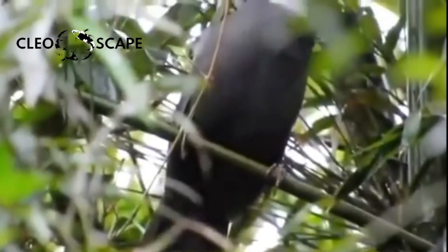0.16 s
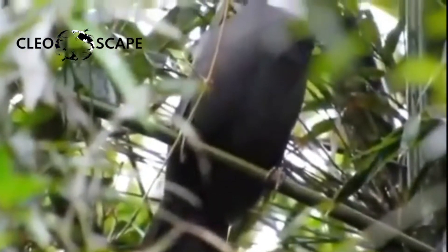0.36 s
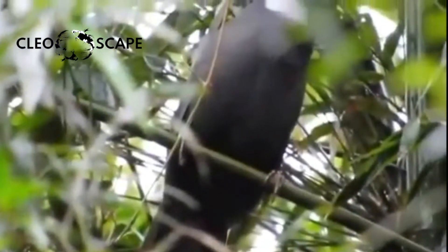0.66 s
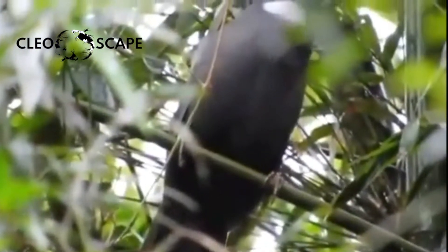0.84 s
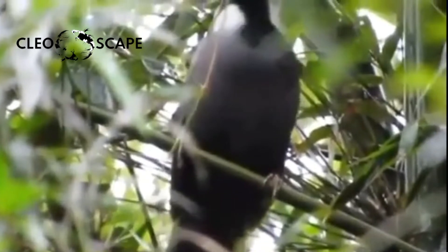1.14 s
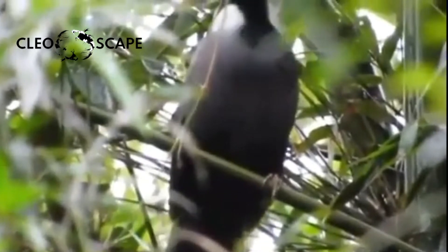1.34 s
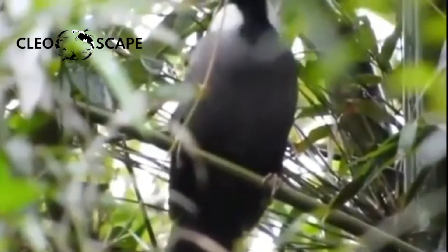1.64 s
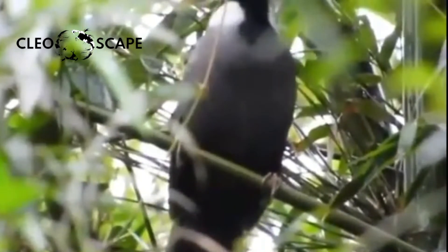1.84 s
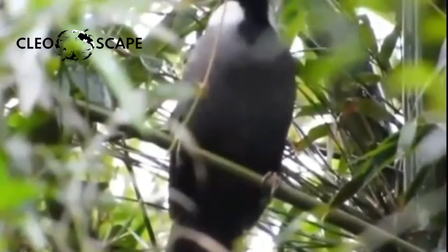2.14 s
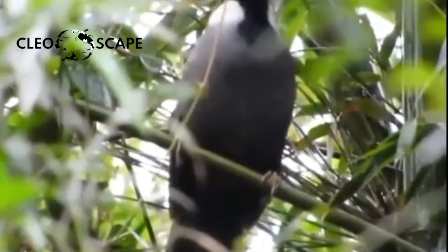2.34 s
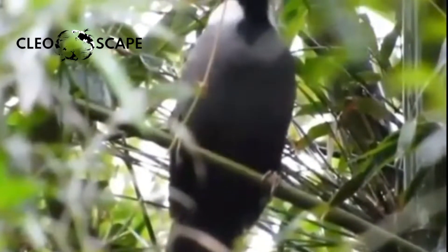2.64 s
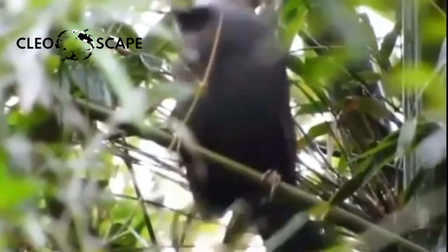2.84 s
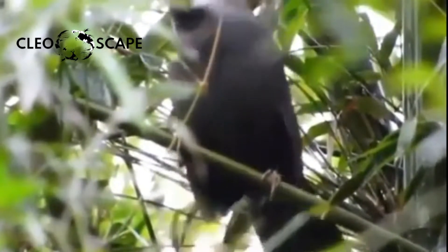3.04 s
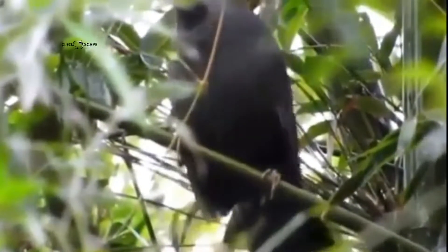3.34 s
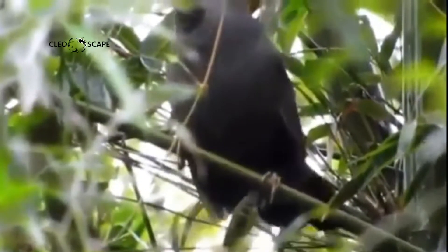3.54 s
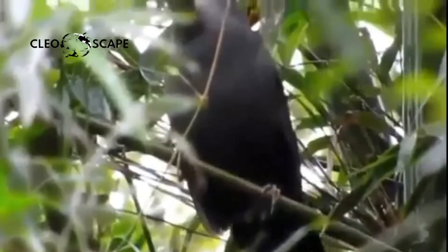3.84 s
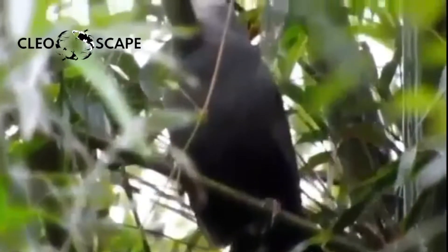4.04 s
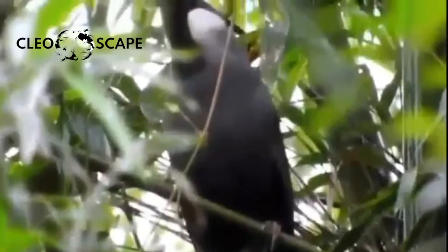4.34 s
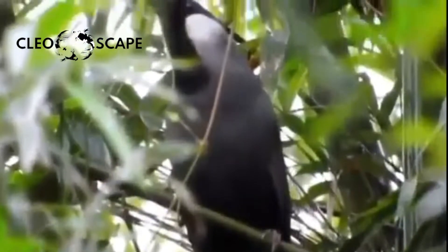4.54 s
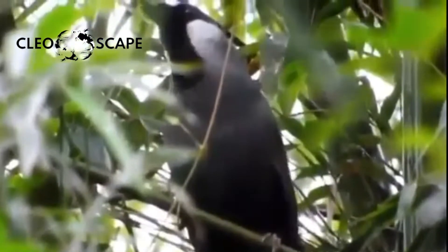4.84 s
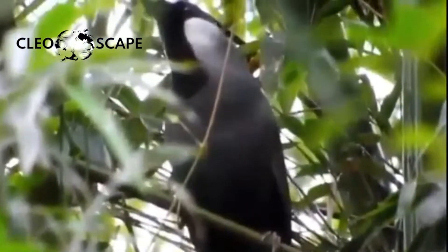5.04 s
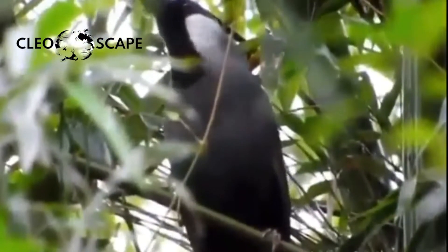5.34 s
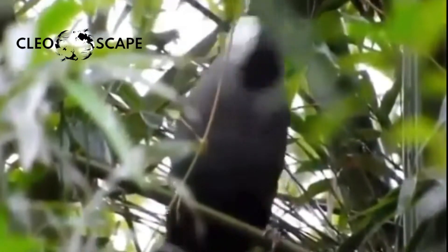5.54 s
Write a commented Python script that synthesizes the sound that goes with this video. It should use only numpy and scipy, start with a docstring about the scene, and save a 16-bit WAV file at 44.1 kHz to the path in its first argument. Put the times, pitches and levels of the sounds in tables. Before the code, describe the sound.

A songbird close by whistles, yelps, hoots softly, rasps upward and breaks into quick warbles while a second bird answers in leafy woodland.

```python
"""A laughingthrush sings close by in dense foliage: an arched whistle, six yelps, a run of hoots, three rising
rasps, then down-slurs that break into warbles. Each voice sums harmonics of an unsteady pitch; throat filters and
noise roughen the harsh ones. A second bird answers with thin and flute-like notes, bent along arched pitch curves.
Echoes and decaying scatter spread the song among leaves and stems, with faint far calls and shaped noise for the
low outdoor rumble; the loudest peaks overload the recorder and flatten."""
import sys
import numpy as np
from scipy import signal
from scipy.fft import rfft, irfft
from scipy.io import wavfile
from scipy.ndimage import uniform_filter1d

SR = 44100
rng = np.random.default_rng(int(sys.argv[2]) if len(sys.argv) > 2 else 0)


def digitize_waveform(pressure):
    """Quantize a signal to 16-bit integers and store it at the path in sys.argv[1].

    Rows of a 2-D input are taken as channels; values are limited to [-1, 1].
    """
    field = np.atleast_2d(pressure).T
    bounded = np.clip(field, -1, 1)
    quanta = np.round(bounded * 32767).astype(np.int16)
    wavfile.write(sys.argv[1], SR, quanta)


N = 250929  # length in samples

# Note levels are set ahead of the throat filters and the foliage.
# the arched whistle's curve: time_s, pitch_hz, level_db
WHISTLE_CURVE = [(0, 972, -5), (.036, 1002, -11.5), (.075, 1260, -11), (.122, 1594, -2.5), (.185, 1867, 0),
                 (.232, 2004, -4.5), (.295, 2009, -4), (.328, 1833, -3), (.39, 1200, -11), (.463, 926, -9)]
# yelps: start_s, length_s, top_hz, level_db, top_at (share of length), ease_db (cut at the top, negative swells),
# fall (roundness, power), rise_db (extra level up to the top)
YELP_NOTES = [(0.692, 0.12, 1702, -6, 0.38, -8, 1.24, -8), (0.911, 0.12, 1651, -7, 0.45, 0, 1.3, -3.5),
              (1.128, 0.12, 1658, -7, 0.39, -0.5, 1.32, -3), (1.36, 0.12, 1708, -7, 0.38, -1.5, 1.32, -5),
              (1.594, .111, 1756, -6.5, 0.39, 8, 1.02, -3), (1.81, 0.1, 1730, -6.5, 0.41, 6.5, 0.99, -3)]
# soft hoots: start_s, length_s, pitch_hz, level_db, sag (share of pitch lost at the end)
HOOT_NOTES = [(2.265, 0.033, 1020, -24, 0.019), (2.331, 0.04, 1011, -13, 0.0065),
              (2.405, 0.044, 1016, -13, 0.012), (2.483, 0.044, 1016, -13.5, 0.027),
              (2.563, 0.042, 1018, -13.5, 0.029), (2.639, 0.045, 1009, -13, 0.05),
              (2.724, 0.043, 1024, -13.5, 0.034), (2.81, 0.039, 1005, -11.5, 0.036),
              (2.904, 0.039, 996, -14, 0.024), (2.996, 0.042, 898, -20, 0.16)]
# rising rasps: start_s, length_s, base_hz, climb_hz_per_s, flick_s, crest_hz, level_db, attack_s,
# roughness (0-1, at the start)
RASP_NOTES = [(3.226, 0.3, 885, 1610, .016, 1880, -14.5, 0.039, 0.93),
              (3.712, 0.29, 943.3, 1651, .021, 1947, -13.5, 0.029, 0.57),
              (4.171, 0.33, 1017, 1375, .015, 1888, -16.5, 0.022, 0.9)]
# the short, harsh chuck before the first warble: time_s, pitch_hz, level_db, roughness (0-1)
CHUCK_CURVE = [(4.775, 998, -29.5, 0.2), (4.803, 963, -13, 0.19), (4.825, 774, -28, 0)]
# quick down-slurs, one of them upward: start_s, length_s, first_hz, last_hz, level_db
SLUR_NOTES = [(4.755, 0.03, 1230, 1164, -20), (4.799, 0.042, 1145, 960, -19),
              (4.784, 0.11, 877, 631, -30.5), (5.143, .053, 1577, 1068, -8.5),
              (5.54, .017, 1450, 1540, -15), (5.548, 0.049, 1526, 1077, -6)]
# warbles: start_s, length_s, climb_start_s, climb_length_s, low_hz, level_db, crest_s (sets where the ripples fall)
WARBLE_NOTES = [(4.824, 0.22, 4.86, 0.18, 993, -19.5, 4.993), (5.263, .17, 5.294, 0.15, 1086, -18.5, 5.84),
                (5.62, 0.076, 5.665, 0.075, 1092, -22.5, 6.1)]
# the second bird's flute notes: start_s, length_s, first_hz, top_hz, last_hz, level_db, top_at (share of length),
# fall (roundness, power), high_db (added to the fifth harmonic and up)
FLUTE_NOTES = [(0.151, .11, 1240, 1333, 1363, -21, 0.55, 2, -18),
               (4.711, 0.095, 888, 1038, 950, -23.5, 0.45, 2.1, -7),
               (5.112, 0.072, 1744, 1867, 1600, -15, 0.22, 0.58, -14.5),
               (5.179, .102, 1635, 1794, 1080, -16.5, 0.44, 3.1, -0.5),
               (5.328, .11, 997, 1304, 1297, -20, .75, 2.8, 1),
               (5.597, 0.095, 1846, 1830, 1220, -16.5, 0.11, .75, -11.5)]
# the second bird's thin, high notes: start_s, length_s, first_hz, top_hz, last_hz, level_db
THIN_NOTES = [(3.42, .41, 1473, 1864, 1693, -24.5), (4.035, .39, 1352, 1811, 1616, -21)]
# faint calls of birds farther off, ahead of a final trim:
# start_s, length_s, first_hz, top_hz, last_hz, level_db
DISTANT_NOTES = [(2.14, 0.16, 3360, 3000, 2840, -52), (2.28, 0.059, 2066, 2286, 2200, -46),
                 (2.98, 0.087, 4200, 4140, 4100, -49), (3.04, 0.075, 2150, 2350, 2330, -50)]

# overtone balance of each voice, following the pitch: harmonic (multiple of pitch), level_db
WHISTLE_HARMONICS = [(1, -3), (2, -31), (3, -39), (4, -47.5), (6, -41.5), (9, -57), (12, -47)]
# yelp overtones: harmonic (multiple of pitch), level_db
YELP_HARMONICS = [(1, -1.5), (3, 0), (4, -8), (6, -15.5), (12, -19.5)]
# hoot and far-call overtones: harmonic (multiple of pitch), level_db
HOOT_HARMONICS = [(1, 1.5), (2, -31.5), (3, -32), (4, -48), (12, -93)]
# rasp overtones: harmonic (multiple of pitch), level_db
RASP_HARMONICS = [(1, -1), (2, 0), (3, -4.5), (4, -2), (5, -10), (12, -15)]
# overtones of the rasp once it clears: harmonic (multiple of pitch), level_db
RASP_CLEAR_HARMONICS = [(1, 1), (2, -4), (3, 3), (4, -5.5), (12, -17)]
# slur overtones: harmonic (multiple of pitch), level_db
SLUR_HARMONICS = [(1, -14), (2, -3), (3, -24.5), (4, -29), (5, -30), (7, -46), (12, -47)]
# warble overtones: harmonic (multiple of pitch), level_db
WARBLE_HARMONICS = [(1, -6.5), (2, -1.5), (3, -21.5), (4, -28), (6, -36), (12, -48)]
# flute overtones, before high_db: harmonic (multiple of pitch), level_db
FLUTE_HARMONICS = [(1, -0.5), (2, -36), (3, -38), (4, -24), (5, -17.5), (6, -26), (12, -76)]
# thin-note overtones: harmonic (multiple of pitch), level_db
THIN_HARMONICS = [(1, -7), (2, -7.5), (3, -2.5), (4, -13), (5, -12.5), (6, -14), (7, -44), (8, -45),
                  (12, -65)]

# throat of the yelps, held still while harmonics sweep through: frequency_hz, gain_db
YELP_RESONANCE = [(600, -21.5), (1100, -18), (1700, -13.5), (2200, -12.5), (2700, -14), (3400, -17),
                  (3700, -7.5), (3980, 0), (4300, -16), (5100, -14), (6500, -19.5), (8200, -18.5),
                  (10000, -26.5), (16000, -27)]
# throat of the rasps, held still too: frequency_hz, gain_db
RASP_RESONANCE = [(500, -39), (900, -9), (1300, -10.5), (1750, -5.5), (2200, -1), (2600, -5), (3000, -5.5),
                  (3500, -4), (4000, 0), (4450, 0), (5000, -18), (5750, -4), (6600, -15.5), (15500, -23.5)]
# fixed windpipe resonance that lights up high overtones of clear notes: frequency_hz, gain_db
WINDPIPE_RESONANCE = [(2000, 0), (4200, 0), (5600, -2), (6500, 2), (7250, 15), (7900, 3), (9300, 10),
                      (10000, -8), (11000, -3), (15000, -6)]
# single reflections off stems: delay_s, level_db
STEM_ECHOES = [(.0065, -12.5), (0.0107, -12.5), (0.022, -22), (0.037, -17.5)]
# decay of the far scatter: frequency_hz, t60_s
LEAF_DECAY = [(500, 0.24), (1000, 0.5), (2000, 0.58), (3000, 0.4), (4000, 0.35), (5500, 0.58), (8000, 0.54),
              (15000, 0.34)]
# tonal shape of the outdoor background: frequency_hz, relative_level_db (per Hz)
AIR_SPECTRUM = [(20, -25), (40, -13), (65, -2.5), (100, 0), (135, -2), (190, -8), (260, -17), (450, -20.5),
                (1300, -19.5), (2500, -23.5), (4500, -25.5), (7700, -31.5), (11000, -38), (15000, -45)]
# left-right likeness of the background: frequency_hz, likeness (-1 to 1)
AIR_LIKENESS = [(60, 1), (240, 0.83), (950, 0.77), (3770, 0.76), (15000, -0.63)]

YELP_FIRST, YELP_LAST = .6, .49  # first and last pitch as shares of the top
YELP_LOCK_HZ, YELP_LOCK_WIDTH_HZ, YELP_LOCK = 1316, 170, 0.434  # falling pitch lingers where the throat rings
BILL_OPEN_S, BILL_SHUT_HZ = 0.024, 4240  # the bill opens: the treble joins a moment after the start
RASP_SCOOP_HZ, RASP_SCOOP_S = 171, .02  # each rasp scoops up from below
RASP_DROP_S, RASP_DROP_HZ_PER_S = 0.013, 8700  # and drops off after its crest
RASP_SAG_DB, RASP_CREST_DB = -4, -1  # level sags along the rasp; the voice thins as it flicks to the crest
RASP_PUSH_DB, RASP_PUSH_HZ, RASP_PUSH_WIDTH_HZ = 4.5, 1480, 140  # one last push on the way up
WARBLE_RATE_HZ = 47.5  # ripples per second
WARBLE_TOP_HZ, WARBLE_TOP_DB, WARBLE_MID_DB = 1905, 5.5, -7.5  # end of the climb; level change there and midway
WARBLE_DEPTH, WARBLE_MID_DEPTH = 0.06, .22  # dips as a share of pitch: always, and added midway up the climb
# unsteadiness as a share of pitch; the fray scales with the warble's dip depth
WHISTLE_JITTER, THIN_JITTER, WARBLE_JITTER, WARBLE_FRAY = .0035, .0035, .003, .02
AIR_DB = -33.5  # rms of the background before it leans to one side
EDGE_HZ = 15850  # upper band limit


def syrinx(t, hz, db, tone, jitter, order=14):
    """A vibrating membrane: harmonics of one slightly unsteady pitch."""
    phase = 2 * np.pi * np.cumsum(hz * (1 + jitter * wander(t, 730))) / SR
    wave = 0
    for k in range(1, order):
        audible = k * hz < SR / 2
        wave = wave + amp(read(tone, k)) * np.cos(k * phase) * audible
    fade = np.clip(np.minimum(t - t[0], t[-1] - t) / 0.00053, 0, 1)  # keeps the ends free of clicks
    return np.sqrt(2) * amp(db) * fade * wave


def notes(courses, tone, jitter):
    """Clear notes: the membrane glides along each curve of time, pitch and level."""
    out = np.zeros(N)
    for t, hz, db in courses:
        add(out, t[0], syrinx(t, hz, db, tone, jitter))
    return out


def whistle(attack_s=0.02, release_s=0.019):
    """A clear note winds along one arch; the windpipe lights up its high overtones."""
    t, hz, db = curves(WHISTLE_CURVE, size=600)
    course = t, hz, db + gate(t, attack_s, release_s)
    return coloured(notes([course], WHISTLE_HARMONICS, WHISTLE_JITTER), WINDPIPE_RESONANCE)


def yelps(hiss_db=-6, jitter=0.014, flutter=0.49, uneven_db=1.0, attack_s=0.011, release_s=.009):
    """Each yelp arches up and down; it flares where the third harmonic crosses the throat resonance."""
    out = np.zeros(N)
    for start, length, top_hz, loud_db, top_at, ease_db, fall, rise_db in YELP_NOTES:
        t, u = span(start, length)
        hz = arch(u, YELP_FIRST * top_hz, top_hz, YELP_LAST * top_hz, top_at, rise=1.85, fall=fall)
        falling = np.clip((u - top_at) / 0.19, 0, 1)
        nearness = np.exp(-((hz - YELP_LOCK_HZ) / YELP_LOCK_WIDTH_HZ) ** 2)
        hz = hz - falling * YELP_LOCK * (hz - YELP_LOCK_HZ) * nearness
        db = loud_db + rise_db * (1 - falling) - ease_db * (hz / hz.max()) ** 10
        db = db + gate(t, attack_s, release_s)
        strain = np.linspace(.4, 1.3, len(t))  # the voice frays toward the end of the yelp
        tone = syrinx(t, hz, db + uneven_db * wander(t, 80), YELP_HARMONICS, jitter * strain)
        hiss = strain * amp(db + hiss_db) * wander(t, 21000)
        fluttered = tone * (1 + flutter * strain * wander(t, 370))
        add(out, t[0], fluttered + opening(hiss))
    return coloured(out, YELP_RESONANCE)


def hoots(scoop=0.118):
    """Soft, nearly pure notes that scoop up to pitch and sag as they close."""
    out = np.zeros(N)
    for start, length, hz, db, sag in HOOT_NOTES:
        t = np.arange(0, length, 1 / SR)
        u = t / length
        bend = 1.015 - scoop * np.exp(-u / 0.22) - sag * u ** 4
        swell = np.sin(np.pi * u) ** 1.05
        add(out, start, swell * syrinx(t, hz * bend, db, HOOT_HARMONICS, jitter=0.0081))
    return out


def climbs(release_s=0.0052, clearing=1.04):
    """Time, pitch, level and roughness of each rasp: a scoop, a climb that clears, a flick to the crest."""
    for start, length, base_hz, climb, flick_s, crest_hz, loud_db, attack_s, rough in RASP_NOTES:
        t, u = span(start, length)
        crest_s = length - RASP_DROP_S
        age = np.minimum(t - start, crest_s)
        past = np.maximum(t - start - crest_s, 0)
        hz = base_hz + climb * age - RASP_SCOOP_HZ * np.exp(-age / RASP_SCOOP_S)
        flick = np.exp((age - crest_s) / flick_s)
        hz = hz + (crest_hz - hz[-1]) * flick - RASP_DROP_HZ_PER_S * past
        push = RASP_PUSH_DB * np.exp(-((hz - RASP_PUSH_HZ) / RASP_PUSH_WIDTH_HZ) ** 2)
        db = loud_db + RASP_SAG_DB * np.sin(np.pi * u / 2) + push + RASP_CREST_DB * flick
        yield t, hz, db + gate(t, attack_s, release_s), rough * np.cos(np.pi * u / 2) ** (2 * clearing)


def rasps(jitter=0.069, flutter=0.51, hiss_db=0, split=1.53, rattle_db=2, clear_hz=1370, blend_hz=100):
    """The membranes rattle irregularly at first and lock into a clear tone as pitch climbs; also the chuck."""
    out = np.zeros(N)
    for t, hz, db, rough in [*climbs(), curves(CHUCK_CURVE)]:
        rough = np.clip(rough, 0, 1)
        # strong and weak cycles alternate in fits, which puts partials between the harmonics
        halves = split * wander(t, 82) * np.cos(np.pi * np.cumsum(hz) / SR)
        tone = syrinx(t, hz, db, RASP_HARMONICS, jitter * np.sqrt(rough))
        tone = tone * (1 + rough * (flutter * wander(t, 760) + halves))
        # near the top of the climb the rattling voice gives way to a steadier one
        clear = np.clip((hz - clear_hz) / blend_hz, 0, 1)
        clear_tone = syrinx(t, hz, db, RASP_CLEAR_HARMONICS, jitter * rough)
        tone = (1 - clear) * tone + clear * clear_tone
        hiss = rough * amp(db + hiss_db) * wander(t, 22500)
        rattle = amp(rattle_db * np.sqrt(rough) * wander(t, 140))
        add(out, t[0], opening(rattle * ((1 - rough / 2) * tone + hiss)))
    return coloured(out, RASP_RESONANCE)


def opening(sound):
    """Muffles the start of a call while the bill is still opening."""
    muffled = signal.sosfiltfilt(signal.butter(2, BILL_SHUT_HZ, fs=SR, output="sos"), sound)
    shut = np.exp(-(np.arange(len(sound)) / SR / BILL_OPEN_S) ** 2)
    return shut * muffled + (1 - shut) * sound


def slurs(ease=1.3, attack_s=.011, release_s=0.015):
    """Quick glides of the membrane's pitch that level out as they end."""
    courses = []
    for start, length, first_hz, last_hz, db in SLUR_NOTES:
        t, u = span(start, length)
        hz = last_hz + (first_hz - last_hz) * (1 - u) ** ease
        courses.append((t, hz, db + gate(t, attack_s, release_s)))
    return notes(courses, SLUR_HARMONICS, jitter=0.013)


def warbles(dip_db=8, sharpness=1.5, stumble=0.034, uneven_db=3.0, attack_s=0.0091, release_s=0.0046):
    """A rising note folded into quick, uneven arches; the throat rings loudest in the dips between them."""
    out = np.zeros(N)
    for start, length, climb_at, climb_s, low_hz, loud_db, crest in WARBLE_NOTES:
        t, _ = span(start, length)
        turn = np.pi * np.clip((t - climb_at) / climb_s, 0, 1)
        height, midway = np.sin(turn / 2) ** 2, np.sin(turn) ** 2
        hz = low_hz + (WARBLE_TOP_HZ - low_hz) * height
        depth = WARBLE_DEPTH + WARBLE_MID_DEPTH * midway
        beats = WARBLE_RATE_HZ * (t - crest) + stumble * wander(t, 49.5)
        dip = depth * abs(np.sin(np.pi * beats)) ** (2 * sharpness)
        db = loud_db + WARBLE_TOP_DB * height + WARBLE_MID_DB * midway + gate(t, attack_s, release_s)
        db = db + dip_db * dip / depth.max() + uneven_db * wander(t, 155)
        jitter = WARBLE_JITTER + WARBLE_FRAY * depth
        add(out, t[0], syrinx(t, hz * (1 - dip), db, WARBLE_HARMONICS, jitter))
    return out


def flutes(rise=2.0, attack_s=0.021, release_s=0.013, waver_db=1.3, jitter=0.011):
    """Round notes that each bend over one top, with their own share of high overtones."""
    out = np.zeros(N)
    for start, length, first_hz, top_hz, last_hz, loud_db, top_at, fall, high_db in FLUTE_NOTES:
        t, u = span(start, length)
        hz = arch(u, first_hz, top_hz, last_hz, top_at, rise, fall)
        db = loud_db + gate(t, attack_s, release_s) + waver_db * wander(t, 32)
        tone = [(k, level + high_db * (k > 4)) for k, level in FLUTE_HARMONICS]
        add(out, start, syrinx(t, hz, db, tone, jitter))
    return out


def thin_notes():
    """Long, high arches of the second bird, rich in overtones and wavering in level."""
    courses = arched(THIN_NOTES, top_at=.52, rise=2.9, fall=4.2, attack_s=0.054, release_s=0.015, waver_db=1.74)
    return notes(courses, THIN_HARMONICS, THIN_JITTER)


def distant_calls():
    """Faint, unsteady calls of birds farther off, each bent along one arch."""
    courses = arched(DISTANT_NOTES, top_at=0.99, rise=1.1, fall=0.98,
                     attack_s=0.013, release_s=0.034, waver_db=4.0)
    return notes(courses, HOOT_HARMONICS, jitter=0.046)


def foliage(x, near_db, far_db, width=.15, near_t60=0.18, size=20):
    """A few stems echo; near leaves scatter briefly and the wood beyond rings on."""
    slots = np.arange(10 * size, SR - size, size)
    taps = np.zeros((2, SR))
    places = slots + rng.integers(0, size, (2, len(slots)))  # one random reflection in each slot
    signs = rng.choice([-1., 1.], (2, len(slots)))
    np.put_along_axis(taps, places, signs, 1)
    hz, t, z = signal.stft(taps, SR, nperseg=256)
    far_decay = np.exp(-np.log(1000) * t / read(LEAF_DECAY, hz)[:, None])
    far = signal.istft(z * far_decay, SR, nperseg=256)[1][:, :SR]
    near_decay = np.exp(-np.log(1000) * np.arange(SR) / SR / near_t60)
    near = taps * rng.choice([-1., 1.], taps.shape) * near_decay
    mid, side = amp(far_db) * far / np.linalg.norm(far[0]) + amp(near_db) * near / np.linalg.norm(near[0])
    mid[0] += 1  # the direct sound
    for delay, db in STEM_ECHOES:
        mid[round(delay * SR)] += amp(db)
    pair = np.array([mid + width * side, mid - width * side])
    return signal.fftconvolve(x[None], pair, axes=1)[:, :N]


def off_axis(pair, shade_db=3, lag_ms=0.019):
    """Sound from one side reaches the left port later, with its treble shaded."""
    hz = np.fft.rfftfreq(N, 1 / SR)
    shade = amp(-shade_db * np.minimum(hz / 7000, 1) ** 2)
    lag = np.exp(-2j * np.pi * hz * lag_ms / 10 ** 3)
    return np.array([irfft(rfft(pair[0]) * shade * lag, N), pair[1]])


def air(lean_db=1):
    """Distant rumble and a faint hiss of leaves: shaped noise with a set left-right likeness."""
    a, b = rfft(rng.standard_normal((2, N)))
    same = np.clip(read(AIR_LIKENESS, np.fft.rfftfreq(N, 1 / SR)), -1, 1)
    pair = irfft(np.array([a, same * a + np.sqrt(1 - same ** 2) * b]), N)
    return amp(AIR_DB) * evened(coloured(pair, AIR_SPECTRUM)) * amp([[-lean_db], [lean_db]])


def arched(table, top_at, rise, fall, attack_s, release_s, waver_db):
    """Time, pitch and level of notes that each make one arch."""
    for start, length, first_hz, top_hz, last_hz, db in table:
        t, u = span(start, length)
        hz = arch(u, first_hz, top_hz, last_hz, top_at, rise, fall)
        yield t, hz, db + gate(t, attack_s, release_s) + waver_db * wander(t, 29)


def arch(u, first_hz, top_hz, last_hz, top_at, rise, fall):
    """Pitch that bends from first to top to last; higher powers flatten the top."""
    before = np.maximum(1 - u / top_at, 0)
    after = np.maximum((u - top_at) / (1 - top_at), 0)
    return top_hz + (first_hz - top_hz) * before ** rise + (last_hz - top_hz) * after ** fall


def span(start, length):
    """Sample times of a note and the share of it that has passed."""
    t = np.arange(0, length, 1 / SR)
    return start + t, t / length


def gate(t, attack_s, release_s):
    """Attack, hold and release, in dB."""
    return 20 * np.log10(np.clip(np.minimum((t - t[0]) / attack_s, (t[-1] - t) / release_s), 1e-3, 1))


def curves(rows, size=200):
    """Sample times and each column of a table, with corners rounded over size samples."""
    s, *columns = np.transpose(rows)
    t = np.arange(s[0], s[-1], 1 / SR)
    return [t] + [uniform_filter1d(np.interp(t, s, c), size, mode="nearest") for c in columns]


def wander(t, hz):
    """Smooth chance of rms 1 that changes up to about hz times a second."""
    noise = rng.standard_normal(2 ** 15)
    smooth = irfft(rfft(noise) / (1 + (np.fft.rfftfreq(len(noise), 1 / SR) / hz) ** 4))
    return np.resize(evened(smooth), len(t))


def coloured(x, spectrum):
    """Filters by a table of frequency_hz, gain_db."""
    return irfft(rfft(x) * amp(read(spectrum, np.fft.rfftfreq(N, 1 / SR))), N)


def read(points, at):
    """Reads a table on a logarithmic axis."""
    where, value = np.transpose(points)
    return np.interp(np.log(at + 1e-9), np.log(where), value)


def amp(db):
    """Decibels to gain."""
    return 10 ** (np.asarray(db) / 20)


def evened(x):
    """Scales to rms 1."""
    return x / np.sqrt(np.mean(x ** 2) + 1e-20)


def add(mix, s, sound):
    """Mixes a sound in at time s."""
    part = mix[max(0, round(s * SR)):][:len(sound)]
    part += sound[:len(part)]


def scene():
    """Both birds in the thicket, over faint far calls and the background."""
    harsh = yelps() + rasps() + warbles() + slurs()
    first = foliage(whistle(), near_db=-14.0, far_db=-11.0, width=0.009)
    first = first + foliage(harsh, near_db=-25.0, far_db=-8.5, width=0.013)
    first = first + foliage(hoots(), near_db=-30.0, far_db=-13, width=0.033)
    answer = coloured(flutes() + thin_notes(), WINDPIPE_RESONANCE)
    second = off_axis(foliage(answer, near_db=-6.0, far_db=-9.5, width=0.43))
    distant = amp(-4) * foliage(distant_calls(), near_db=1.0, far_db=5, width=.4)
    return first + second + distant + air()


def record(dry, ceiling=1, order=20):
    """The loudest peaks flatten against the recorder's ceiling; then the band limit."""
    clipped = dry / (1 + abs(dry / ceiling) ** order) ** (1 / order)
    band_limit = signal.firwin(511, EDGE_HZ, window=("kaiser", 9), fs=SR)
    return signal.oaconvolve(clipped, band_limit[None], "same")


dry = scene()
out = record(dry)
digitize_waveform(out)
```